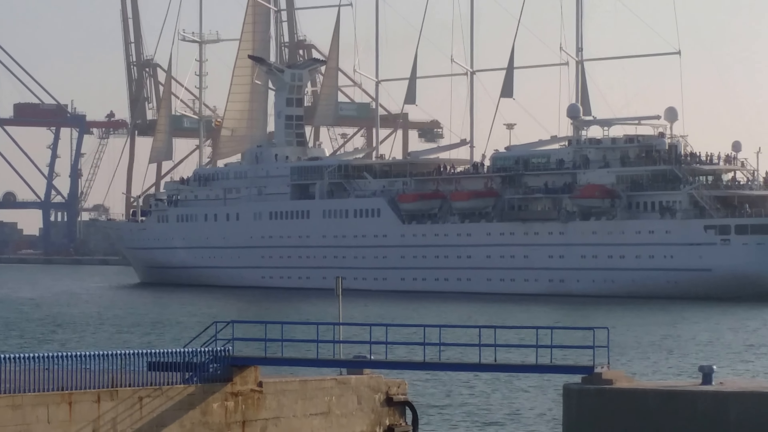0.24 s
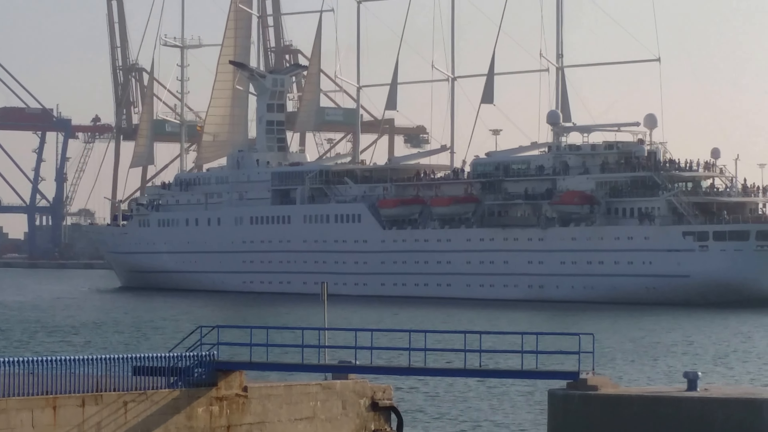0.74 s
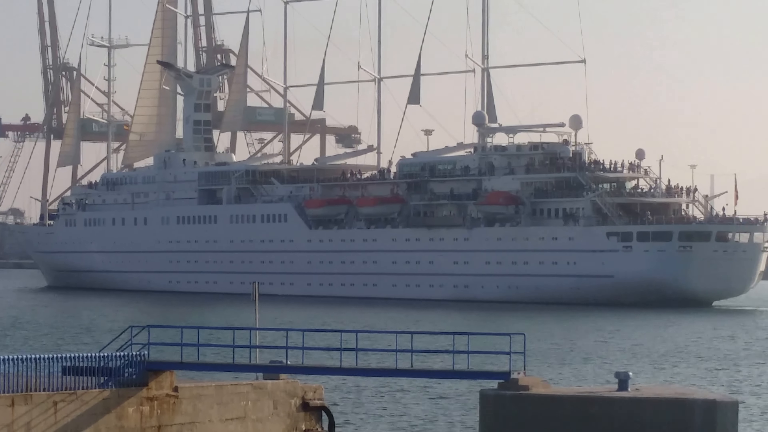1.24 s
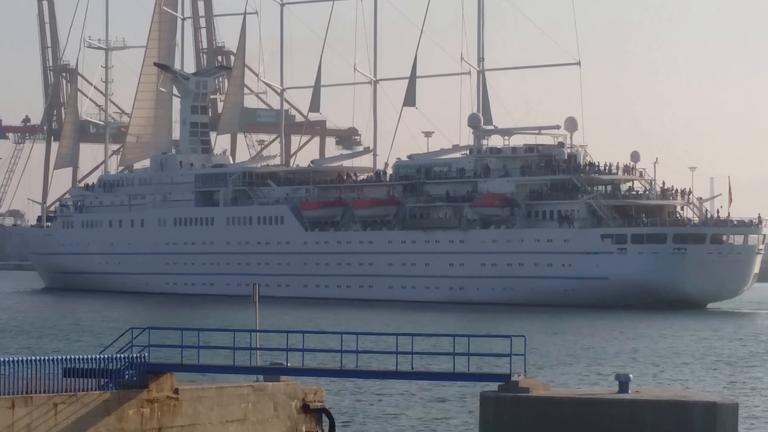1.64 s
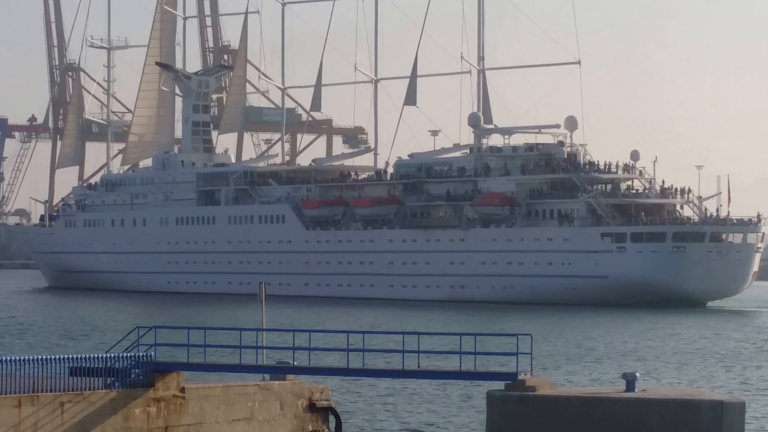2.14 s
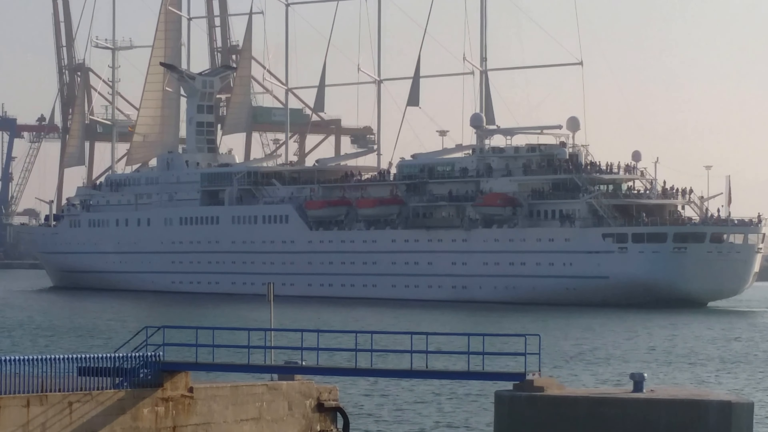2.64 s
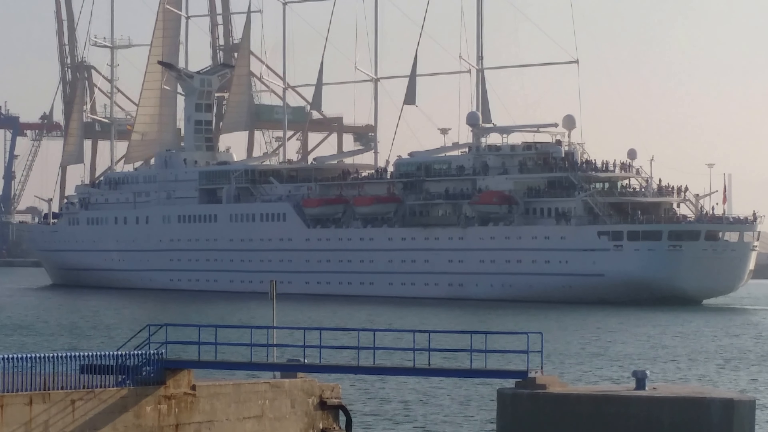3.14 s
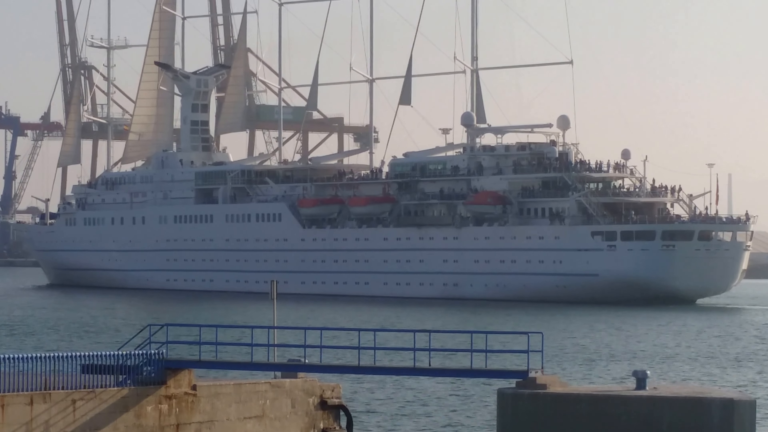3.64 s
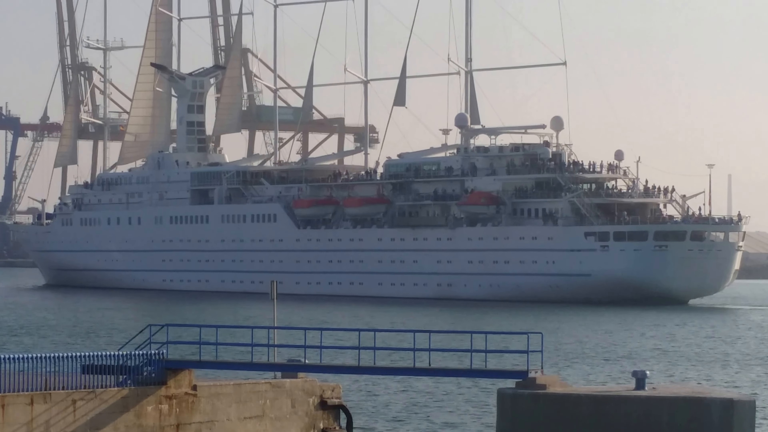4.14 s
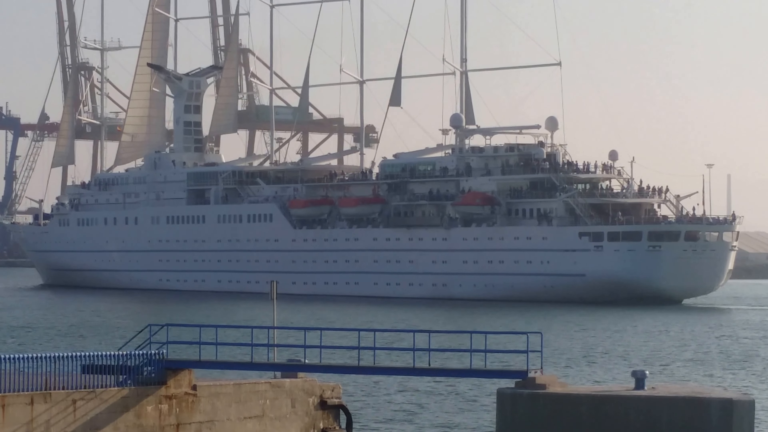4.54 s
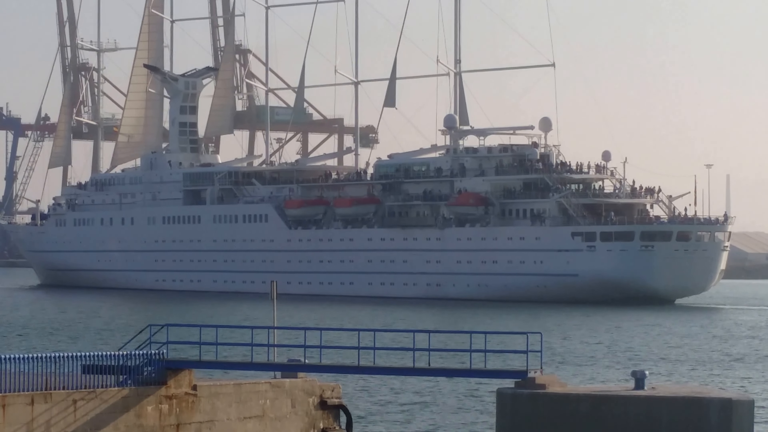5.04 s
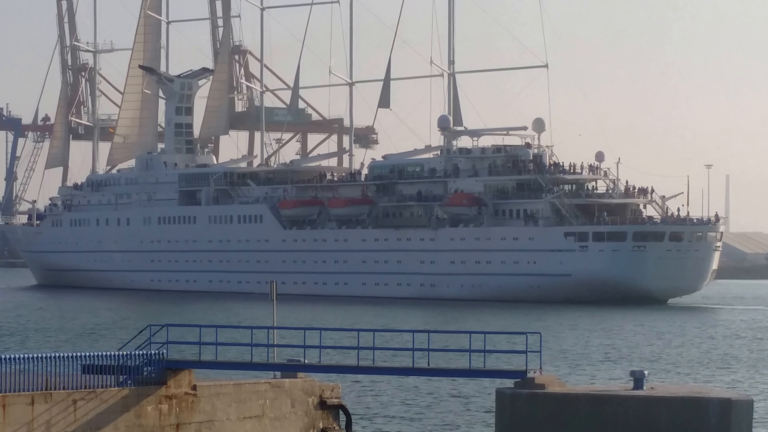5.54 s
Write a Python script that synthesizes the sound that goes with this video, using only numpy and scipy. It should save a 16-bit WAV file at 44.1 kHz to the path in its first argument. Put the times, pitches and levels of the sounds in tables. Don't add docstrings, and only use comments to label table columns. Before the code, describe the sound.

A large ship moving off a harbour quay gives a continuous deep rumble and low hum, with soft wash hiss above. Outdoors, on a hand-held stereo camera, wind thumps the microphones during the first second. Faint lens motor whirs recur. Just before three seconds a sharp plastic click bounces, mostly at left, followed by finger rubbing; then the steady drone continues, slightly duller.

```python
import sys
import numpy as np
from scipy import signal
from scipy.io import wavfile
from scipy.ndimage import uniform_filter1d

SR = 44100
rng = np.random.default_rng(int(sys.argv[2]) if len(sys.argv) > 2 else 0)


def output_pcm(signal):
    pcm = np.clip(np.atleast_2d(signal).T, -1, 1) * 32767
    wavfile.write(sys.argv[1], SR, np.round(pcm).astype(np.int16))


def nominal_scale(level):
    x = np.asarray(level, float) / 20
    return 10 ** x


N = 255582
EDGE_HZ = 15760
CLICK_S = 2.9362


def evened(x):
    return x / np.sqrt(np.mean(x ** 2) + 1e-20)


def read(points, hz, axis=1):
    points = np.asarray(points)
    return np.interp(np.log(hz + 1), np.log(points[:, 0] + 1), points[:, axis])


def curve(rows, t, axis=1):
    rows = np.asarray(rows)
    return np.interp(t, rows[:, 0], rows[:, axis])


def swells(rows, t):
    power = 0
    for peak_s, rise_s, fall_s, db in rows:
        side_s = np.where(t < peak_s, rise_s, fall_s)
        power = power + nominal_scale(db) ** 2 * np.exp(-2 * ((t - peak_s) / side_s) ** 2)
    return np.sqrt(power)


def add(mix, s, sound):
    part = mix[:, round(s * SR):][:, :sound.shape[1]]
    part += sound[:, :part.shape[1]]


def drift(top_hz):
    t = np.arange(N)[::64] / SR
    waves = [np.sin(2 * np.pi * (f * t + rng.random())) / np.sqrt(f) for f in np.geomspace(.1, top_hz, num=12)]
    return evened(sum(waves)).repeat(64)[:N]


def resonate(x, hz, width):
    turn = np.exp(2j * np.pi * np.cumsum(hz * np.ones(x.shape[-1])) / SR)
    r = np.exp(-np.pi * width / SR)
    return 2 * (turn * signal.lfilter([(1 - r) ** 2], [1, -2 * r, r * r], x / turn)).real


def ringing_noise(length, hz, width):
    return evened(resonate(rng.standard_normal((2, length)), hz, width))


def balance(pan_db):
    return nominal_scale([[pan_db / 2], [-pan_db / 2]])


def ports(hz):
    # pitch_hz, left_minus_right_db
    port_tilt = [(60, 1.5), (200, 2.5), (450, 3), (1200, 2), (2500, 6), (3300, -3.5), (4300, 12.5),
                 (5300, -1), (8200, -1.5), (9800, 8), (12500, 4), (15500, 0.5)]
    half = nominal_scale(read(port_tilt, hz) / 2)
    return np.array([half, 1 / half]) * 2 / (half + 1 / half)


def noise(spectrum, size, patchy_db, tilt_db=0.):
    # pitch_hz, likeness (0 to 1), left_lead_rad
    likeness = [(60, 0.97, 0), (130, 1, 0), (293, 0.91, 0.1), (510, 0.5, 0.7), (710, 0.13, -1.1),
                (970, 0.12, -1.5), (1290, 0.28, -3.9), (1750, 0.14, -1.2), (2520, 0.41, -2), (4020, .04, 0),
                (15000, .05, 0)]
    hop, hz = size // 4, np.fft.rfftfreq(size, 1 / SR)
    a, b, c, d, patches = rng.standard_normal((N // hop + 5, len(hz), 5)).T
    patches = uniform_filter1d(patches, size // 100, axis=0)
    patches = evened(uniform_filter1d(patches, 12000 // size, axis=1))
    same = np.clip(read(likeness, hz), 0, 1)[:, None]
    lag = np.exp(-1j * read(likeness, hz, axis=2))[:, None]
    left = a + 1j * b
    right = same * lag * left + np.sqrt(1 - same ** 2) * (c + 1j * d)
    gain = nominal_scale(read(spectrum, hz)[:, None] + patchy_db * patches + tilt_db)
    z = np.array([left, right]) * gain * (hz < EDGE_HZ)[:, None] * ports(hz)[:, :, None]
    x = signal.istft(z, nperseg=size, noverlap=size - hop)[1][:, :N]
    return x / np.sqrt(np.mean(x.mean(0) ** 2))


def focus_wakes():
    # start_s, length_s, level_db
    motor_runs = [(.1, .13, -82), (1.17, .19, -78), (2.18, .17, -78), (3.22, .19, -79), (4.26, .27, -79),
                  (5.3, .12, -83)]
    # pitch_hz, width_hz, level_db, left_minus_right_db
    step_rings = [(12330, 260, 2, 3), (10350, 600, -10, 9), (13000, 3000, -6, 2)]
    out = np.zeros((2, N))
    for start, length, db in motor_runs:
        phase = np.arange(0, length, 1 / SR) * 96.5
        step_gain = nominal_scale(2.5 * rng.standard_normal(64))[phase.astype(int)]
        steps = step_gain * np.exp(-(phase % 1) / .12) * rng.standard_normal((2, len(phase)))
        for hz, width, ring_db, pan_db in step_rings:
            band = evened(resonate(steps, hz, width)) * signal.windows.tukey(len(phase), .15)
            add(out, start, nominal_scale(db + ring_db) * band * balance(pan_db))
    return out


def focus_seek():
    # multiple, level_db, left_minus_right_db
    seek_orders = [(2, -84, 8), (3, -78, 3)]
    start_s, length_s, step_hz = 2.55, .14, 5168
    out = np.zeros((2, N))
    t = np.arange(0, length_s, 1 / SR)
    for k, db, pan_db in seek_orders:
        hz = round(k) * step_hz
        song = np.sin(2 * np.pi * hz * t) + .6 * ringing_noise(len(t), hz, 90)
        add(out, start_s, nominal_scale(db) * song * signal.windows.tukey(len(t), .2) * balance(pan_db))
    return out


def zoom_drive():
    start_s, every_s, on_s = 1.95, .133, .085
    level_db, pitch_hz, width_hz = -79, 9500, 2000
    out = np.zeros((2, N))
    for k in range(9):
        band = ringing_noise(round(on_s * SR), pitch_hz * rng.uniform(.97, 1.03), width_hz)
        gain = nominal_scale(level_db + 2 * rng.standard_normal()) * signal.windows.tukey(band.shape[1], .5)
        add(out, start_s + (k + rng.normal(0, .05)) * every_s, gain * band * balance(11))
    return out


def wash():
    # pitch_hz, level_db (per Hz)
    hiss_colour = [(1650, -21), (2800, 2.5), (3260, -8), (3750, -6.5), (4000, 3), (4400, 4), (4810, -1),
                   (5280, -18.5), (5890, -21.5), (8260, -37.5), (9340, -27), (11400, -18), (12400, -14),
                   (14600, -8.5), (15700, -4.5)]
    level_db, start_db, full_db, rise_s = -71.5, .5, 4, .9
    swell_db = start_db + (full_db - start_db) * np.minimum(np.arange(N) / SR / rise_s, 1)
    return nominal_scale(level_db + swell_db) * noise(hiss_colour, size=512, patchy_db=-0.74)


def rumble():
    # pitch_hz, level_db (per Hz)
    rumble_colour = [(15, -24), (31, -19), (43, -8.5), (62, -1.5), (100, 2), (140, -3), (200, -4),
                     (270, -8), (360, -13.5), (600, -18.5), (990, -23.5), (1200, -28), (2030, -35),
                     (2670, -41.5), (3000, -77.5)]
    # time_s, level_db, brightness_db
    rumble_ride = [(0, -33, 5), (.25, -31.5, 0.5), (1.0, -32.5, 0.5), (2.0, -32, -0.5), (2.7, -32.5, 0),
                   (3.2, -34, 0), (3.9, -32.5, -1), (4.4, -34, -2), (5.8, -33, -1)]
    frames = np.arange(N // 512 + 5) * 512 / SR
    upper = np.clip(np.log(np.fft.rfftfreq(2048, 1 / SR) / 600 + 1e-3), 0, 1)[:, None]
    bright_db = curve(rumble_ride, frames, axis=2)
    tilt_db = upper * (bright_db - bright_db.mean())
    roar = noise(rumble_colour, size=2048, patchy_db=0.84, tilt_db=tilt_db)
    return nominal_scale(curve(rumble_ride, np.arange(N) / SR)) * roar


def wind():
    # peak_s, rise_s, fall_s, level_db
    port_gusts = [
        [(.38, 0.044, .2, -22), (.72, 0.074, 0.049, -22.5)],
        [(0, .1, .12, -34), (.79, 0.091, .04, -20), (1.05, 0.26, 0.29, -31.5)],
    ]
    breeze_db = [-35.5, -43.5]
    breeze_slope = [-6.5, -0.2]
    t = np.arange(N) / SR
    lumps = ringing_noise(N, 77.6, 82)
    breeze = nominal_scale(np.c_[breeze_db] + np.c_[breeze_slope] * t)
    return lumps * np.hypot([swells(rows, t) for rows in port_gusts], breeze)


def wind_thumps():
    # time_s, peak_db, pitch_hz, port (0 left, 1 right)
    thumps = [(0.361, -12, 94, 0), (0.413, -17.5, 112, 0), (0.486, -14, 83, 0), (0.532, -7, 98, 0),
              (.606, -13.5, 91, 0), (0.625, -11, 89, 0), (0.794, -19, 82, 0), (.735, -18, 89, 1),
              (0.772, -21, 83, 1), (0.808, -10.5, 109, 1), (1.024, -7, 103, 0), (1.0242, -17, 260, 0)]
    out = np.zeros((2, N))
    u = np.arange(-1600, 1600) / SR
    for s, db, hz, port in thumps:
        shape = np.exp(-(u * hz / .7) ** 2)
        start_rad = np.pi / 2 if round(port) else 4.4
        thump = nominal_scale(db) * shape * np.sin(2 * np.pi * hz * u + start_rad)
        add(out, s + u[0], np.outer(np.arange(2) == round(port), thump))
    return out


def skin_rub():
    # peak_s, rise_s, fall_s, level_db
    slides = [(.23, .015, .012, -89), (.35, .02, .012, -94), (1.31, 0.076, .4, -85.5),
              (2.28, 0.14, 0.066, -76), (2.65, 0.33, .3, -82), (2.92, .04, 0.014, -69),
              (3.0, .03, .06, -71), (3.35, 0.25, 0.34, -77), (3.57, 0.057, 0.044, -65),
              (3.645, 0.048, .02, -63), (3.78, 0.014, 0.065, -65), (3.8, 0.16, 0.22, -73.5),
              (4.04, .015, 0.11, -80), (4.4, 0.27, .2, -88), (5.09, 0.34, 0.13, -79), (5.38, 0.15, .1, -84)]
    # pitch_hz, level_db (per Hz)
    skin_colour = [(1820, -26), (3100, 0), (4560, -6.5), (5340, -16), (7050, -23), (7960, -23.5),
                   (9000, -14), (9630, -7.5), (12500, -6.5), (13800, -13), (15700, -8.5)]
    hiss = noise(skin_colour, size=256, patchy_db=2)
    return nominal_scale(3.5) * swells(slides, np.arange(N) / SR) * hiss * nominal_scale([[1.5], [-4]])


def finger_strokes():
    # first_hz, last_hz, width_hz, level_db, left_minus_right_db
    strokes = [
        ((2.94, 0.083, 0.27), [(270, 150, 110, -22, 17)]),
        ((2.937, .078, 0.61), [(4000, 3940, 530, -43, 27), (4650, 4750, 600, -50, 20), (1400, 1300, 850, -42, 8), (540, 450, 370, -33.5, 17), (14000, 14000, 2500, -60, 8)]),
        ((3.52, .135, 0.23), [(1160, 1580, 280, -43.5, 4), (1500, 1700, 900, -49.5, 4), (2100, 2700, 700, -56, -1)]),
        ((3.56, .09, .75), [(1700, 1940, 290, -49, 4)]),
        ((3.93, .115, .6), [(2100, 2170, 200, -59, 1)]),
    ]
    edge_db = -8
    out = np.zeros((2, N))
    for (start, length, full), rings in strokes:
        u = np.arange(0, length, 1 / SR) / length
        from_full = np.where(u < full, 1 - u / full, (u - full) / (1 - full))
        pressure = nominal_scale(edge_db * from_full) * signal.windows.tukey(len(u), .25)
        for first_hz, last_hz, width, db, pan_db in rings:
            ring = ringing_noise(len(u), first_hz + (last_hz - first_hz) * u, width)
            add(out, start, nominal_scale(db) * pressure * ring * nominal_scale([[0], [-pan_db]]))
    return out


def ticks():
    # time_s, level_db, length_ms
    bright_ticks = [(.232, -63, 4), (.325, -63, 1), (.337, -63, 1), (.347, -53, 1), (1.025, -70, 3),
                    (3.83, -60, 1)]
    out, t = np.zeros((2, N)), np.arange(1200) / SR
    high_pass = signal.butter(4, 8800, "high", fs=SR, output="sos")
    for s, db, length_ms in bright_ticks:
        u = t / length_ms * 1000
        burst = signal.sosfilt(high_pass, ringing_noise(len(t), 15400, 6000))
        add(out, s - length_ms / 1000, nominal_scale(db) * (u * np.exp(1 - u)) ** 3 * burst * nominal_scale([[0], [-9]]))
    return out


def button_and_knocks():
    # pitch_hz, peak_db, rise_ms (negative pulls), delay_ms, left_minus_right_db
    touch_modes = [(4230, -39, -0.8, 0.026, 19), (1300, -35.5, -0.63, .2, 5)]
    button_modes = [(4015, -9.5, -.52, 0, 27), (4000, -18, -.8, .5, 19), (4000, -30, -1.5, 1.5, 25),
                    (2700, -28.5, -.6, 0.5, 8), (750, -24, -.9, 0, 16), (10000, -34, .5, -.1, 17),
                    (12800, -32, .35, -.2, 12), (15500, -26, .45, -.3, 10), (1900, -27, 1.4, 1.5, 13),
                    (1660, -21, 0.95, 3, 21)]
    spring_modes = [(1720, -20.5, 1.64, 0.011, 28), (980, -16.5, .78, 0, 14), (4000, -39, .7, 0.23, 14)]
    bounce_s = [2.9578, 2.9765]
    bounce_db = [0, -10.5]
    # time_s, peak_db, pitch_hz, rise_ms (negative pulls)
    grip_knocks = [
        (2.735, -18, 380, -1.8),
        (2.9395, -10.5, 105, 4),
        (2.966, -13, 340, 2),
        (2.98, -18.5, 415, 4),
        (2.9824, -14.5, 140, -3.5),
    ]
    # time_s, peak_db, pitch_hz
    fingertips = [(.214, -43, 1900), (.23, -36, 1470), (3.832, -46.5, 3200), (4.047, -48, 2000),
                  (4.047, -54.5, 3200), (4.066, -48, 2200), (4.078, -53, 3600)]
    blows = [(2.7318, 0, touch_modes), (CLICK_S, 0, button_modes)]
    blows += [(s, db, spring_modes) for s, db in zip(bounce_s, bounce_db)]
    rows = []
    for s, blow_db, modes in blows:
        for hz, db, rise_ms, delay_ms, pan_db in modes:
            rows.append((s + delay_ms / 1000, blow_db + db, hz, rise_ms, pan_db))
    rows += [(*row, 24) for row in grip_knocks]
    rows += [(s, db, hz, 1000 * 2.6 / hz, 3) for s, db, hz in fingertips]
    out, t = np.zeros((2, N)), np.arange(1200) / SR
    for s, db, hz, rise_ms, pan_db in rows:
        rise = abs(rise_ms) / 1000
        swell = (t / rise * np.exp(1 - t / rise)) ** 3
        ring = np.sign(rise_ms) * nominal_scale(db) * swell * np.cos(2 * np.pi * hz * (t - rise))
        add(out, s - rise, ring * nominal_scale([[0], [-pan_db]]))
    return out


def tone(hz, db, waver_db, start_rad):
    wave = np.sqrt(2) * np.cos(2 * np.pi * np.cumsum(hz * np.ones(N)) / SR + start_rad)
    return ports(np.mean(hz))[:, None] * nominal_scale(db + waver_db * drift(2.5)) * wave


def fan_and_funnel():
    # peak_s, rise_s, fall_s, level_db (rms)
    fan_swells = [(2.3, .55, .35, -34.5), (3.57, .1, 0.22, -40), (4.15, 0.13, 0.5, -39)]
    # peak_s, rise_s, fall_s, level_db (rms)
    funnel_swells = [(.9, 0.73, 0.81, -33.5), (2.3, 0.48, .45, -33.5), (3.55, 0.22, 0.37, -40),
                     (4.25, 0.14, .45, -34.5), (5.8, 0.24, .3, -39.5)]
    t = np.arange(N) / SR
    fan = swells(fan_swells, t) * tone(157.5 * (1 + .002 * drift(1.2)), 0, 0.47, 0)
    return fan + swells(funnel_swells, t) * tone(90, 0, 0.49, 0)


def pumps():
    # pitch_hz, level_db (rms)
    pump_lines = [(36, -42.5), (165.2, -57.5), (198.2, -52.5), (217.8, -53.5), (221.8, -55.5), (235, -52),
                  (303.8, -58), (316.8, -57)]
    return sum(tone(hz, db, 1.65, 2 * np.pi * rng.random()) for hz, db in pump_lines)


def engines():
    # multiple, level_db (rms)
    engine_set = [
        (4.267, 0, .6, 1, [(5, -58), (6, -45), (11, -41.5), (12, -41), (13, -45), (16, -50), (18, -44), (19, -48), (24, -49), (30, -52)]),
        (22.5, .0003, .8, 0, [(5, -49), (8, -36.5)]),
        (118.17, .0004, 1.5, 0, [(1, -51), (2, -55), (3, -49.5), (4, -65), (5, -64)]),
    ]
    out = np.zeros((2, N))
    for hz, wander, waver_db, crank_rad, orders in engine_set:
        speed = hz * (1 + wander * drift(0.97))
        for k, db in orders:
            out += tone(k * speed, db, waver_db, k * crank_rad + rng.normal(0, .3))
    return out


def scene():
    lens = focus_wakes() + focus_seek() + zoom_drive()
    air = wind() + wind_thumps()
    hand = skin_rub() + finger_strokes() + ticks() + button_and_knocks()
    ship = wash() + rumble() + fan_and_funnel() + pumps() + engines()
    return lens + air + hand + ship


def top_cut(x):
    return signal.sosfilt(signal.butter(12, 17150, fs=SR, output="sos"), x)


def record(dry):
    t = np.arange(N) / SR
    dry = signal.sosfilt(signal.butter(4, 21, "high", fs=SR, output="sos"), dry)
    low_pass = signal.firwin(401, EDGE_HZ, window=("kaiser", 9), fs=SR)
    narrow = signal.oaconvolve(dry, low_pass[None], "same")
    wide = .4 * np.exp(-((t - CLICK_S) / .002) ** 2)
    soft_start = np.clip(t / .002, 0, 1)
    warm_up = nominal_scale(-2.5 / (1 + (t / .45) ** 4))
    return top_cut((narrow + wide * (dry - narrow)) * soft_start * warm_up)


dry = scene()
out = record(dry)
output_pcm(out)
```